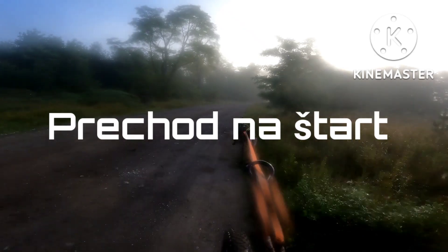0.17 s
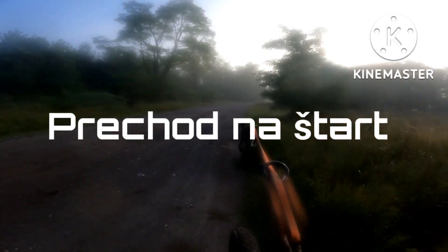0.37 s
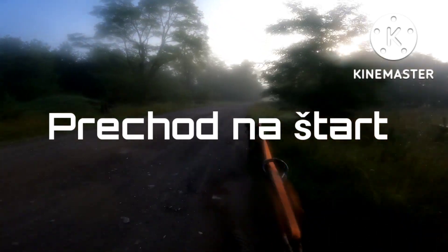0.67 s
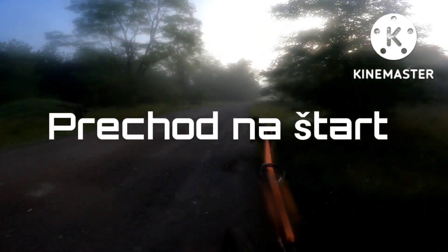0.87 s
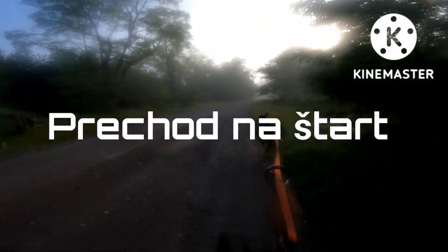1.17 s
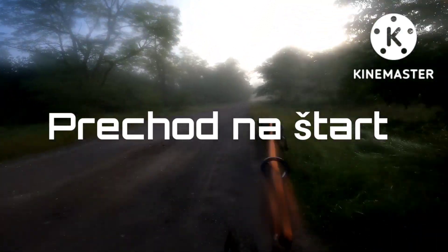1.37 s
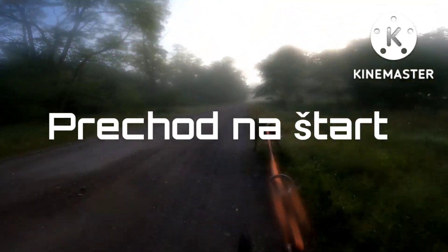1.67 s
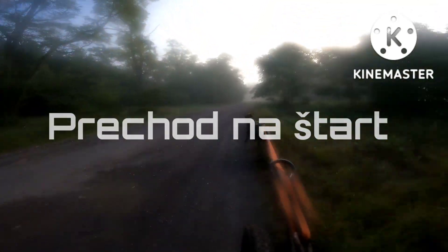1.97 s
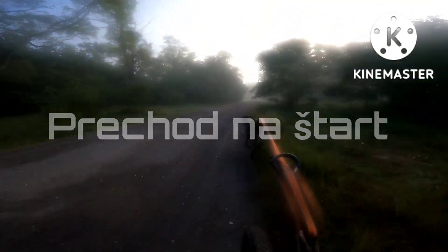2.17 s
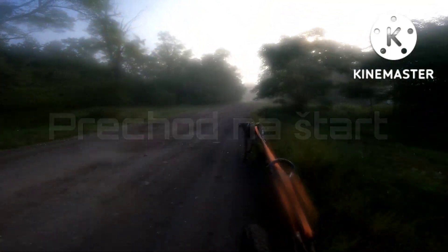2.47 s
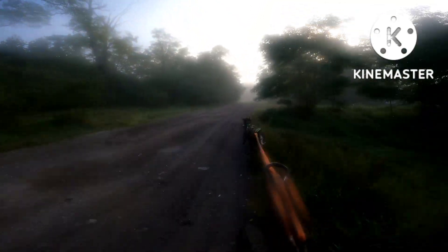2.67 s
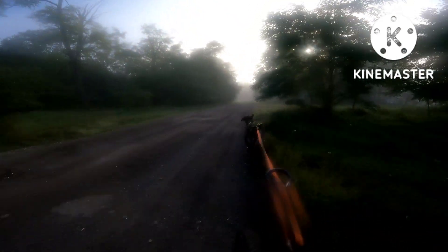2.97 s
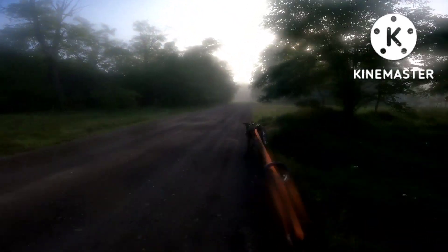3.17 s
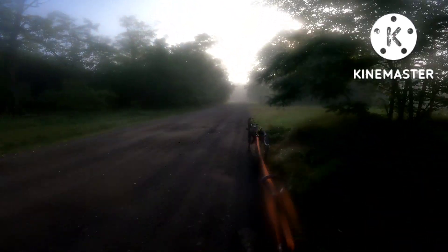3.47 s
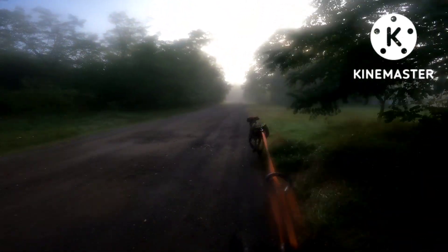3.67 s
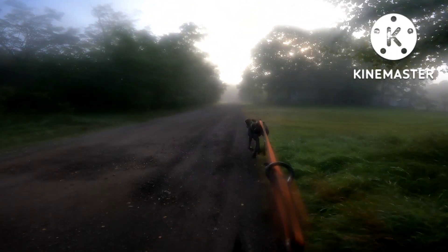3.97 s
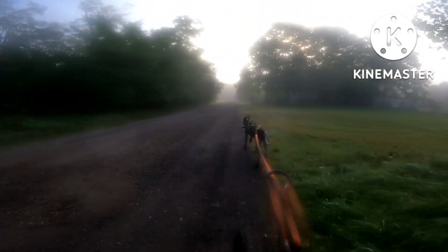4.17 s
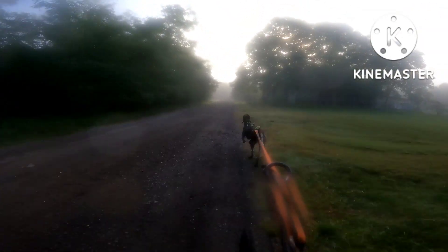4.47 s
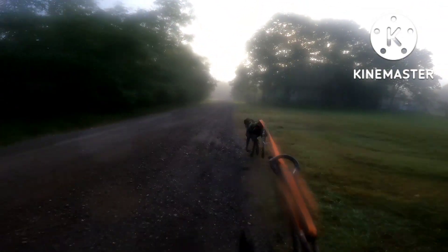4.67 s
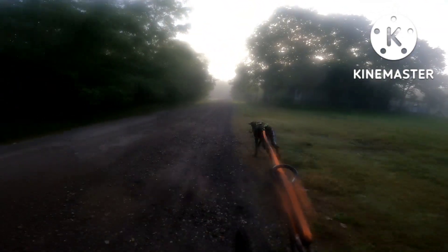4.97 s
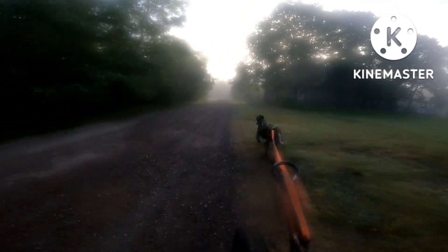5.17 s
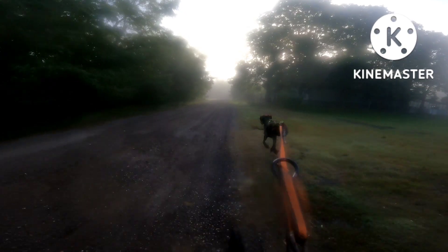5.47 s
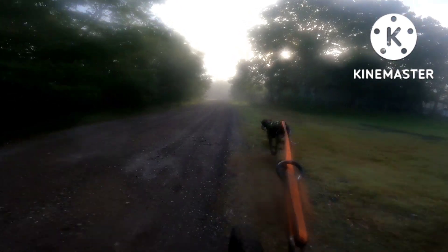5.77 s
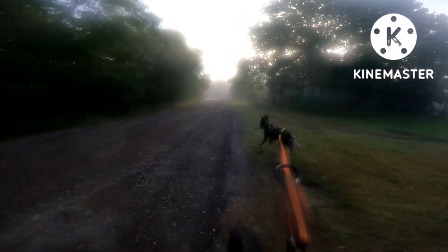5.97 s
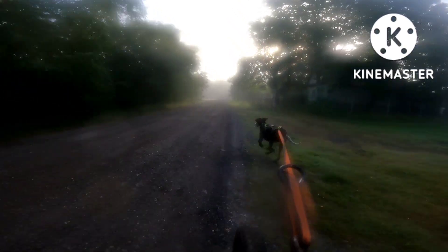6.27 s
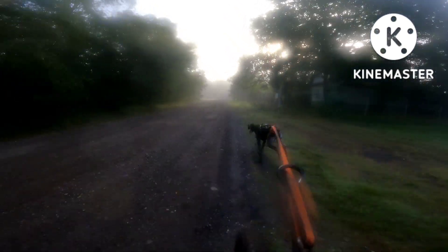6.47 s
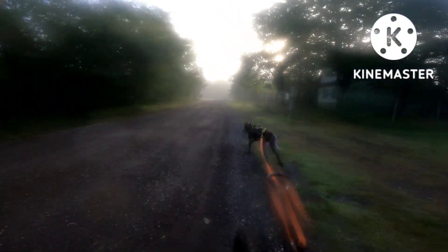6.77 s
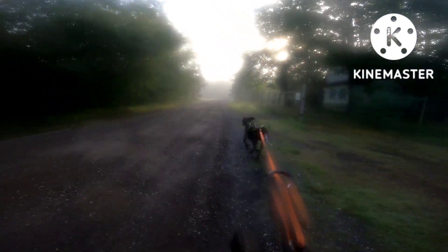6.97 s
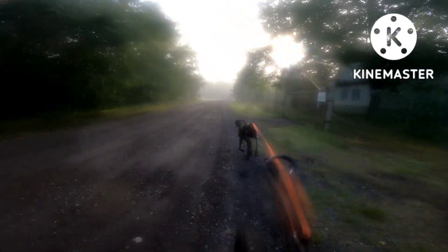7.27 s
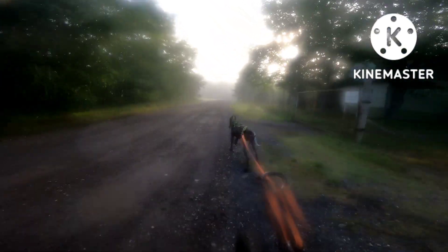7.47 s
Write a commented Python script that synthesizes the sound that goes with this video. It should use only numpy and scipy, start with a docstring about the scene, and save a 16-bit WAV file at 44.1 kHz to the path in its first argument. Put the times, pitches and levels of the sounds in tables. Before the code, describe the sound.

A scooter rolls quickly over loose gravel outdoors, gritty crunching and hollow stone pops over deep wind rumble, with occasional low jolts.

```python
"""On a gravel road, a scooter towed by a dog rolls fast with a camera on board.
Wind rumble, mount drone and frame rumble are shaped noise; the tread's crunch is a crowd of tiny impacts.
A metal part rings through resonant modes and whines as a wavering sine when it rubs; stones pop as short
falling tones, ruts shudder low, and pebbles and chips crack as noise bursts.
The tyre swishes briefly at the verge; a limiter holds the peaks and the extreme treble is cut."""
import sys
import numpy as np
from scipy import signal
from scipy.fft import rfft, irfft, next_fast_len
from scipy.io import wavfile
from scipy.ndimage import uniform_filter1d, minimum_filter1d, map_coordinates

SR = 44100
rng = np.random.default_rng(int(sys.argv[2]) if len(sys.argv) > 2 else 0)


def bounce(signal):
    """Save signal as a 16-bit WAV file at the path given by the first command-line argument."""
    frames = np.transpose(np.atleast_2d(signal))
    limited = np.clip(frames, -1, 1)
    pcm = np.round(limited * 32767).astype(np.int16)
    wavfile.write(sys.argv[1], SR, pcm)


N = 335424


def amp(db):
    """Decibels to gain."""
    return 10 ** (np.asarray(db) / 20)


def unit(x):
    """Scale to rms 1."""
    return x / np.sqrt(np.mean(x ** 2) + 1e-20)


def curves(rows):
    """Draw one automation curve per column after the time, joining its points with straight lines."""
    times, *columns = np.transpose(rows)
    return [np.interp(np.arange(N) / SR, times, column) for column in columns]


def wobble(rate):
    """A smooth random curve with this many knots a second."""
    knots = rng.standard_normal(int(N * rate / SR) + 4)
    return map_coordinates(knots, [np.arange(N) * rate / SR])


def filtered(x, response):
    """Multiply the spectrum of x by a response of frequency."""
    size = next_fast_len(N + SR // 2)
    return irfft(rfft(x, size) * response(np.fft.rfftfreq(size, 1 / SR)), size)[:N]


def colour(x, points, size=16384):
    """Pass x through a causal (minimum-phase) body with this spectrum, scaled to rms 1."""
    hz, db = np.transpose(points)
    gain = amp(np.interp(np.log(np.fft.rfftfreq(size, 1 / SR) + 1), np.log(hz), db))
    # folding the cepstrum onto positive time makes the body respond only after it is struck
    cepstrum = irfft(np.log(gain))
    cepstrum[1:size // 2] *= 2
    cepstrum[size // 2 + 1:] = 0
    body = irfft(np.exp(rfft(cepstrum)))
    return unit(signal.fftconvolve(x, body)[:N])


def contacts(per_second, spread_db, bed_db):
    """Random impacts of uneven size over a noise bed that stands for countless tiny ones."""
    sizes = amp(spread_db * np.clip(rng.standard_normal(N), -2, 2)) * rng.choice([-1, 1], N)
    impacts = unit(sizes * (rng.random(N) < per_second / SR))
    return impacts + amp(bed_db) * rng.standard_normal(N)


def grains(per_second, centre_hz, cycles, spread_db, bed_db, size=320):
    """Each stone rings briefly at its own pitch, within an octave of the centre, over finer grinding."""
    count = int(per_second * N / SR)
    when, pitch, strength = rng.random((count, 3)).T[:, :, None]
    n = np.arange(size)
    turns = centre_hz * 2 ** (2 * pitch - 1) * n / SR
    rings = amp(spread_db * strength ** 2) * np.sin(2 * np.pi * turns) * np.exp(-turns / cycles)
    positions = (when * N).astype(int) + n
    crowd = np.bincount(positions.ravel(), rings.ravel(), N)[:N]
    return unit(crowd) + amp(bed_db) * rng.standard_normal(N)


def even(x, seconds):
    """Hold the short-term strength of a noise near 1."""
    width = max(int(seconds * SR), 2)
    power = uniform_filter1d(uniform_filter1d(x * x, width), width)
    return x / np.sqrt(np.abs(power) + 1e-6)


def hump(s, half_s):
    """A bell of height 1 around time s, down to 1/e at half_s either side."""
    return np.exp(-((np.arange(N) / SR - s) / half_s) ** 2)


def add(track, s, sound):
    """Mix a sound into the track at time s."""
    part = track[max(round(s * SR), 0):][:len(sound)]
    part += sound[:len(part)]


def cracks(rows, spectrum, t60, gain_db):
    """Hard contacts: a very short noise burst each, in the colour of what is struck."""
    out, t = np.zeros(N), np.arange(SR // 20) / SR
    noise = colour(rng.standard_normal(N), spectrum)
    envelope = amp(-60 * t / t60) * (1 - np.exp(-t / 0.00024)) ** 2
    for s, db in rows:
        # each burst takes its own stretch of the noise
        burst = np.roll(noise, -round(s * SR))[:len(t)] * envelope
        add(out, s, amp(db + gain_db) * burst / np.abs(burst).max())
    return out


# headwind strength, around which quick gusts play: (time [s], level [dB])
HEADWIND = [(0, -27), (.2, -20.5), (.7, -20), (1.4, -19.5), (2.05, -21), (2.4, -23), (2.8, -21),
            (3.7, -23.5), (4.3, -21.5), (5.7, -20.5), (6.45, -20.5), (7.0, -21), (7.61, -18.5)]
# colour of wind on the microphone: (frequency [Hz], relative level [dB])
WIND_COLOUR = [(12, -14.5), (22, 2), (32, 2), (44, -1), (55, -1.5), (68, -11.5), (95, -17), (125, -20.5),
               (165, -25), (300, -32.5), (700, -101)]


def wind():
    """The headwind buffets the microphone steadily as a low rumble, with small quick gusts."""
    level_db, = curves(HEADWIND)
    rumble = even(colour(rng.standard_normal(N), WIND_COLOUR), seconds=0.028)
    return amp(level_db + 1.17 * wobble(12)) * rumble


# how hard the camera mount shakes: (time [s], level [dB])
MOUNT_SHAKE = [(0, -26.5), (.2, -23), (.48, -26), (.6, -30.5), (1.03, -37), (1.5, -27.5), (1.83, -30),
               (2.03, -19.5), (2.2, -22.5), (2.35, -27), (2.85, -20.5), (3.0, -27), (3.25, -21.5),
               (3.6, -23), (4.15, -24.5), (4.4, -20), (4.7, -24.5), (5.1, -22), (5.6, -20), (6.2, -23),
               (6.38, -40), (6.8, -22.5), (7.3, -22), (7.5, -38)]
# colour of the shaking mount: (frequency [Hz], relative level [dB])
MOUNT_COLOUR = [(25, -26), (45, -12), (56, 3.5), (70, -4.5), (95, -12), (125, -17.5), (165, -32),
                (500, -94), (2000, -120)]


def mount():
    """The ride keeps the camera mount droning on a low resonance."""
    shake_db, = curves(MOUNT_SHAKE)
    drone = even(colour(rng.standard_normal(N), MOUNT_COLOUR), seconds=0.068)
    return amp(shake_db) * drone


# how bumpy the road is: (time [s], stone knocking before a 2 dB cut [dB], frame rumble [dB])
ROAD_BUMPS = [(0, -38.5, -33), (.55, -33, -30.5), (.72, -34, -36), (1.03, -32.5, -27), (1.14, -36, -31),
              (1.4, -36, -30), (1.95, -30, -29.5), (2.2, -33, -32), (2.5, -38.5, -28), (3.0, -39.5, -29.5),
              (3.22, -27, -28.5), (3.45, -35.5, -30.5), (3.8, -36, -27), (4.6, -31.5, -30),
              (5.35, -27.5, -25.5), (6.1, -32, -32), (6.6, -33.5, -29), (7.35, -30, -30),
              (7.61, -30.5, -31)]
# colours of the rumbling frame and the knocking stones: (frequency [Hz], relative level [dB])
FRAME_COLOUR = [(90, -28), (160, -9.5), (200, -4.5), (240, -1.5), (260, -1.5), (281, 1.5), (305, -4),
                (400, -13), (600, -15.5), (1500, -81), (8000, -110)]
KNOCK_COLOUR = [(150, -22.5), (300, -2.5), (410, -2), (480, 3), (560, 6.5), (660, -3), (800, -9.5),
                (1100, -16), (2000, -32), (5000, -78), (12000, -110)]


def frame():
    """Bumps shake the frame into a rumble; stones thud in the tyres."""
    knock_db, rumble_db = curves(ROAD_BUMPS)
    shaking = contacts(per_second=300, spread_db=4.5, bed_db=-4.5)
    rumble = even(colour(shaking, FRAME_COLOUR), seconds=0.078)
    thuds = contacts(per_second=170, spread_db=3, bed_db=-8)
    knocks = even(colour(thuds, KNOCK_COLOUR), seconds=0.23)
    uneven = wobble(20)  # both layers swell together
    return amp(rumble_db + 1.82 * uneven) * rumble + amp(knock_db - 2.0 + 1.1 * uneven) * knocks


# the tyre bites into loose stones; each gravel layer takes a share of the swell:
# (time [s], full swell [dB], half length to 1/e [s])
LOOSE_HEAPS = [(0.061, 9, 0.0049), (0.204, 10, 0.0074), (0.516, 8, 0.019), (.56, 7.5, 0.023),
               (0.637, 10, .008), (0.655, 2, 0.011), (0.948, 4, 0.027), (1.27, 2.5, .015),
               (1.318, 3.5, .008), (1.676, 4, 0.016), (1.875, 5, 0.011), (1.927, 5, 0.009),
               (2.146, 3, 0.023), (2.225, 6, 0.011), (2.394, 5, 0.018), (2.703, 8, 0.007),
               (2.783, 8.5, 0.016), (3.033, 8.5, 0.011), (3.808, 6.5, 0.011), (3.852, -2, 0.0045),
               (4.08, 2, .012), (5.634, 5, 0.0066), (5.806, 7.5, 0.01), (5.917, 7.5, 0.014),
               (6.514, 8.5, 0.01), (6.538, 7, 0.012), (6.683, 7.5, 0.012), (7.03, 3, .018),
               (7.217, 10.5, 0.0079), (7.286, 11.5, 0.0067), (7.368, 6.5, 0.034), (7.59, 6.5, 0.031)]


def heaps():
    """Full swell of the crunch in dB as the tyre bites into loose stones."""
    return sum(db * hump(s, half) for s, db, half in LOOSE_HEAPS)


# the surface under the tread, before swells and clumping:
# (time [s], coarse gravel level [dB], crunch level [dB], fine grit level [dB])
ROAD_SURFACE = [(0, -42.5, -44, -50.5), (.45, -47, -49, -53), (.8, -44.5, -45, -50.5),
                (1.3, -38.5, -38, -47.5), (1.68, -42.5, -35.5, -46), (2.1, -42.5, -39, -49),
                (2.85, -41.5, -39, -48.5), (3.15, -37, -36, -47.5), (3.5, -40.5, -41, -50.5),
                (4.2, -36.5, -36.5, -46.5), (4.6, -37, -36, -49.5), (5.7, -34, -40, -50),
                (6.35, -39, -44.5, -54.5), (6.75, -38, -43, -54), (7.3, -33, -39, -48),
                (7.61, -35, -44, -50.5)]
# share of the heap swell in each layer: (coarse [ratio], crunch [ratio], grit [ratio])
SWELL_SHARES = [.6, .95, .4]
# sand thrown up by the tread: (time [s], half length to 1/e [s], change of level [dB])
SAND_THROWN = [(1.55, 0.33, -1.5), (4.115, 0.14, 9.5), (5.85, 0.25, 6), (7.293, 0.72, 8.5)]
# colours of coarse gravel, crunch, grit and thrown sand: (frequency [Hz], relative level [dB])
COARSE_COLOUR = [(300, -19.5), (700, 1), (950, 0), (1300, -2), (1600, -6), (2200, -5.5), (3500, -27),
                 (8000, -56.5), (14000, -88)]
CRUNCH_COLOUR = [(700, -22), (1500, -7.5), (1900, -4.5), (2200, -3.5), (2350, -3), (2550, 1), (2780, -2),
                 (3050, 0.5), (3550, -5.5), (4000, -14.5), (5200, -25), (8000, -61.5), (14000, -83.5)]
GRIT_COLOUR = [(2000, -16.5), (3500, 8), (4600, 5), (5400, 2.5), (6700, 3.5), (7300, -2.5), (7900, -13.5),
               (8800, -24), (9800, -18.5), (11500, -29), (13000, -32.5), (15000, -41)]
SAND_COLOUR = [(3000, -21), (6000, -4), (7500, 0.5), (10200, -7), (12000, -13), (14000, -29)]
SAND_UNDER_GRIT_DB = -22  # sand away from the patches, relative to the grit


def gravel():
    """Stones grind together in clumps under the tread; small ones sound higher."""
    coarse_db, crunch_db, grit_db = np.array(curves(ROAD_SURFACE)) + np.outer(SWELL_SHARES, heaps())
    patches_db = sum(db * hump(s, half) for s, half, db in SAND_THROWN)
    sand_db = grit_db + SAND_UNDER_GRIT_DB + patches_db
    clumps = .6 * wobble(35) + 1.2 * wobble(130)  # shared, so the layers clump together

    coarse = colour(contacts(per_second=400, spread_db=5.0, bed_db=1.5), COARSE_COLOUR)
    crunch = colour(grains(per_second=700, centre_hz=2397, cycles=3.7, spread_db=8, bed_db=6),
                    CRUNCH_COLOUR)
    grit = colour(grains(per_second=1200, centre_hz=5140, cycles=23.0, spread_db=6.0, bed_db=6),
                  GRIT_COLOUR)
    sand = colour(grains(per_second=780, centre_hz=8600, cycles=7.1, spread_db=14, bed_db=3.5),
                  SAND_COLOUR)

    coarse *= amp(coarse_db + 1.07 * clumps)
    crunch *= amp(crunch_db + 0.99 * clumps)
    grit *= amp(grit_db + 1.21 * clumps + 0.91 * wobble(30))
    sand *= amp(sand_db + 2.6 * clumps)
    return coarse + crunch + grit + sand


# rubs of the metal part; whine and ringing sit below this level:
# (time [s], level [dB], half length to 1/e [s])
METAL_RUBS = [(.21, -41, 0.018), (0.265, -45, 0.019), (.56, -44, 0.046), (0.648, -41, 0.021),
              (0.897, -43, 0.04), (0.963, -33.5, 0.023), (1.27, -39, .025), (1.328, -38, 0.016),
              (1.57, -40, 0.016), (1.674, -31, .02), (1.724, -41, 0.042), (1.883, -34.5, 0.0099),
              (1.985, -36.5, 0.041), (2.11, -45, 0.03), (2.398, -35.5, 0.038), (2.583, -46, .045),
              (2.746, -42, 0.028), (2.847, -43, .02), (3.09, -44, .02), (3.2, -40, 0.015),
              (3.75, -44.5, 0.053), (4.24, -37, 0.028), (4.39, -39, .04)]
# modes of the metal part: (frequency [Hz], width [Hz], relative level [dB])
METAL_MODES = [(1704, 29, 1.5), (2172, 180, -5.5), (2562, 56, -6.5)]
RING_DB = -47  # ringing from the ride alone
RUBBED_RING_DB, WHINE_DB = -3.5, -2.5  # rough ringing and thin whine, relative to the rub
CHATTER_DB, WAVER_HZ = 3.5, 18.9  # typical shake of the whole part's level and of the whine's pitch


def resonance(f, hz, width):
    """A damped mode: a band-pass peak of height 1 at hz, with its far skirts trimmed."""
    peak = 1j * f * width / (hz ** 2 - f * f + 1j * f * width)
    return peak * np.exp(-((f - hz) / 220) ** 2)


def metal():
    """A metal part rings faintly all the way; each rub draws a thin, wavering whine at its lowest mode."""
    def modes(f):
        """All the part's resonances summed."""
        return sum(amp(db) * resonance(f, hz, width) for hz, width, db in METAL_MODES)

    ring = even(filtered(rng.standard_normal(N), modes), seconds=0.025)
    rubbing = sum(amp(db) * hump(s, half) for s, db, half in METAL_RUBS)
    pitch_hz = METAL_MODES[0][0] + WAVER_HZ * wobble(70)
    whine = unit(np.sin(2 * np.pi * np.cumsum(pitch_hz) / SR))
    ringing = (amp(RING_DB) + amp(RUBBED_RING_DB) * rubbing) * ring
    return amp(CHATTER_DB * wobble(140)) * (amp(WHINE_DB) * rubbing * whine + ringing)


# stones under the tyre: (time [s], peak level before a 1 dB lift [dB], pitch it settles to [Hz])
STONE_POPS = [(0.165, -27, 554), (0.328, -30, 507), (0.454, -17, 405), (0.483, -22, 557), (0.599, -17, 523),
              (0.619, -21.5, 610), (0.807, -20, 485), (0.836, -18.5, 520), (0.847, -21.5, 630),
              (0.979, -22, 610), (1.05, -16, 400), (1.073, -15.5, 470), (1.184, -20, 524),
              (1.211, -26, 584), (1.249, -20.5, 575), (1.563, -21, 533), (1.754, -19, 587),
              (1.760, -16.5, 456), (1.85, -25.5, 538), (1.943, -16.5, 478), (1.971, -15, 474),
              (2.014, -21.5, 556), (2.053, -18.5, 527), (2.291, -21, 545), (3.177, -24.5, 490),
              (3.21, -27, 554), (3.262, -18, 606), (3.307, -19.5, 544), (3.353, -23, 530),
              (3.694, -21, 514), (3.713, -24, 536), (3.753, -20.5, 530), (3.769, -19.5, 506),
              (4.05, -20, 517), (4.086, -18, 530), (4.424, -15, 526), (4.637, -21, 520), (4.65, -16, 511),
              (4.767, -18, 510), (4.784, -25, 538), (4.995, -16.5, 530), (5.006, -23.5, 604),
              (5.078, -26, 450), (5.192, -17, 586), (5.295, -14.5, 404), (5.337, -18, 566),
              (5.451, -16, 541), (5.482, -12, 495), (5.585, -17, 475), (5.718, -16, 463),
              (5.822, -25.5, 585), (6.016, -19, 520), (6.044, -20.5, 530), (6.12, -23, 560),
              (6.176, -16, 540), (6.259, -20, 430), (6.364, -22, 417), (6.556, -21, 622), (6.783, -20, 510),
              (6.825, -20.5, 533), (6.935, -19, 547), (6.968, -20, 524), (7.034, -20.5, 470),
              (7.098, -21, 580), (7.11, -21, 527), (7.175, -22, 493), (7.319, -12, 456), (7.345, -18, 464),
              (7.421, -20, 530), (7.507, -19.5, 570), (7.533, -17.5, 523)]


def stones(t60=0.017, snap=0.9):
    """A stone squeezed out from under the tyre pops for a few cycles, highest at first."""
    out, t = np.zeros(N), np.arange(SR // 20) / SR
    for s, db, hz in STONE_POPS:
        falling_hz = hz * (1 + snap * np.exp(-t / 0.00057))
        phase = 2 * np.pi * np.cumsum(falling_hz) / SR
        pop = np.sin(phase) * amp(-60 * t / t60) * (1 - np.exp(-t / 0.0018))
        add(out, s, amp(db + 1) * pop / np.abs(pop).max())
    return out


# ruts that jolt the scooter: (time [s], peak level [dB], centre pitch [Hz])
RUT_JOLTS = [(0.446, -12.5, 129.3), (1.02, -18, 240), (2.16, -13, 104.6), (3.261, -12.5, 107.6),
             (4.43, -17, 121), (5.523, -15, 111.4), (5.631, -13.5, 109), (6.202, -12, 94),
             (6.92, -19.5, 123), (7.258, -15.5, 128)]


def jolts(t60=0.23, attack=0.0032, width_octaves=0.58):
    """A rut rattles the camera mount for a few low, irregular cycles of narrow-band noise."""
    out, t = np.zeros(N), np.arange(SR // 4) / SR
    f = np.fft.rfftfreq(len(t), 1 / SR) + 1
    for s, db, hz in RUT_JOLTS:
        band = np.exp(-(np.log2(f / hz) / width_octaves) ** 2)
        shudder = irfft(rfft(rng.standard_normal(len(t))) * band, len(t))
        thump = even(shudder, seconds=0.011) * amp(-60 * t / t60) * (1 - np.exp(-t / attack))
        add(out, s, amp(db) * thump / np.abs(thump).max())
    return out


# hard pebbles under the tread: (time [s], peak level before a 1 dB lift [dB])
PEBBLE_HITS = [(0.6378, -25), (1.069, -19.5), (1.662, -21.5), (1.877, -21), (2.708, -20), (3.532, -20.5),
               (3.7438, -17.5), (3.858, -19.5), (4.5303, -18), (4.9641, -14.5), (5.4829, -20), (5.573, -18),
               (5.633, -15), (5.693, -22), (6.1225, -21), (6.7844, -12), (6.9643, -16.5), (7.287, -14),
               (7.5084, -29)]
# colour of a pebble's clack: (frequency [Hz], relative level [dB])
CLACK_COLOUR = [(200, -20.5), (500, 0.5), (900, 8.5), (1400, 1), (2300, -5.5), (3300, -21.5), (4500, -41),
                (9000, -59)]


def pebbles():
    """Hard pebbles clack under the tread as mid-range bursts."""
    return cracks(PEBBLE_HITS, CLACK_COLOUR, t60=0.013, gain_db=1.0)


# chips that strike the frame; tick and tail both sit below this: (time [s], reference level [dB])
CHIP_HITS = [(2.1479, -13), (4.045, -33), (4.272, -31), (4.57, -29), (6.001, -29), (6.992, -23),
             (7.197, -22)]
# colour of a chip's tick: (frequency [Hz], relative level [dB])
TICK_COLOUR = [(1500, -24), (3000, 13.5), (4500, 5.5), (6800, 6.5), (8200, -12), (10000, -21), (12000, -36),
               (15000, -42)]


def chips():
    """Chips tick brightly against the frame, each with its tail of grit."""
    return cracks(CHIP_HITS, TICK_COLOUR, t60=0.0086, gain_db=-5.0) + chip_tails()


def chip_tails(t60=0.21, under_db=-27):
    """A chip that strikes the frame scatters a short, fading tail of grit."""
    t = np.arange(N) / SR
    tail = sum(amp(db + under_db - 60 * np.abs(t - s) / t60) * (t > s) for s, db in CHIP_HITS)
    return tail * colour(contacts(per_second=1200, spread_db=3, bed_db=-2), GRIT_COLOUR)


# tyre swishes at the verge: (time [s], level [dB], half length to about -9 dB [s])
VERGE_SWISHES = [(3.049, -31.5, 0.014), (3.086, -40, 0.016), (3.237, -34, 0.016)]
# colour of the flung grit: (frequency [Hz], relative level [dB])
SPRAY_COLOUR = [(1500, -15), (3000, 12), (5000, 2.5), (7000, -0.5), (9500, -6.5), (11000, -20),
                (15000, -40.5)]


def spray():
    """The tyre swishes brightly and flings a dense spray of grit where it brushes the verge."""
    t = np.arange(N) / SR
    swell = sum(amp(db) / (1 + ((t - s) / half) ** 2) ** 1.56 for s, db, half in VERGE_SWISHES)
    return swell * colour(contacts(per_second=4300, spread_db=0.0, bed_db=-5), SPRAY_COLOUR)


def scene():
    """Everything reaches one microphone from close by."""
    ride = wind() + mount() + frame() + gravel() + metal()
    hits = stones() + jolts() + pebbles() + chips()
    return (ride + hits + spray())[None]


TOP_HZ, CEILING_DB = 15050, -7.3  # band limit; limiter ceiling


def record(dry, size=221):
    """A quick look-ahead limiter (size in samples), then the camera's band limit."""
    needed = np.minimum(1, amp(CEILING_DB) / (np.abs(dry[0]) + 1e-9))
    gain = uniform_filter1d(minimum_filter1d(needed, size), size)
    return filtered(dry[0] * gain, lambda hz: hz < TOP_HZ)[None]


dry = scene()
out = record(dry)
bounce(out)
```